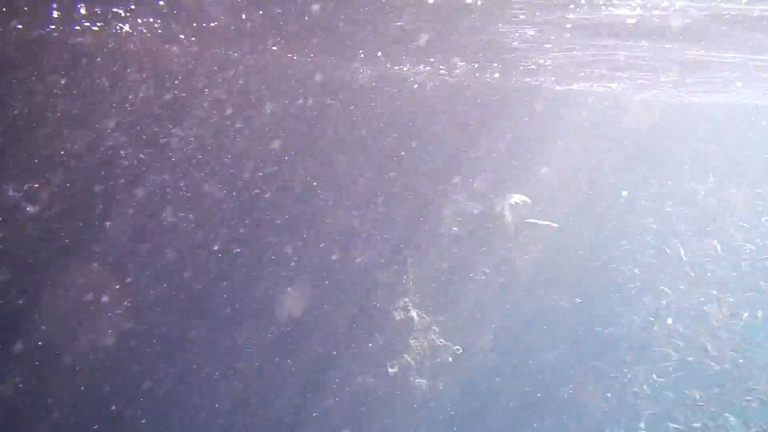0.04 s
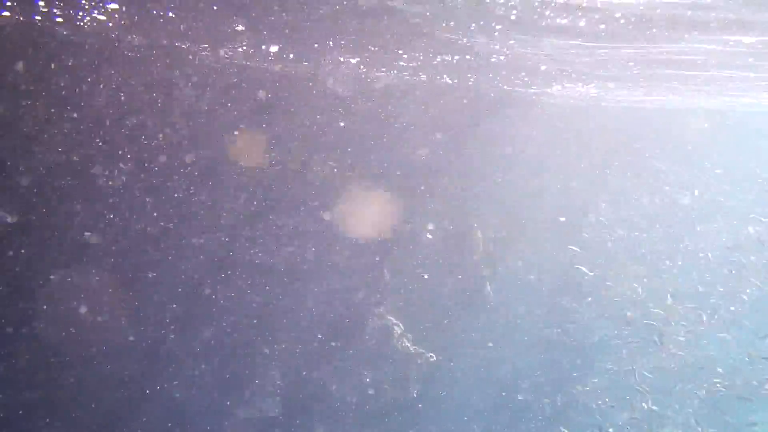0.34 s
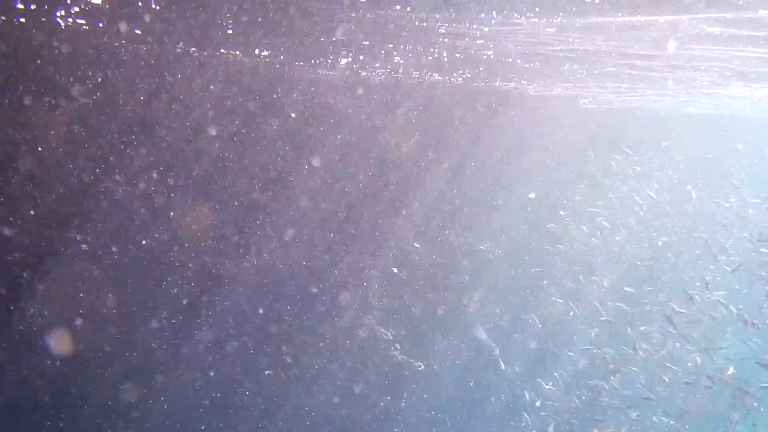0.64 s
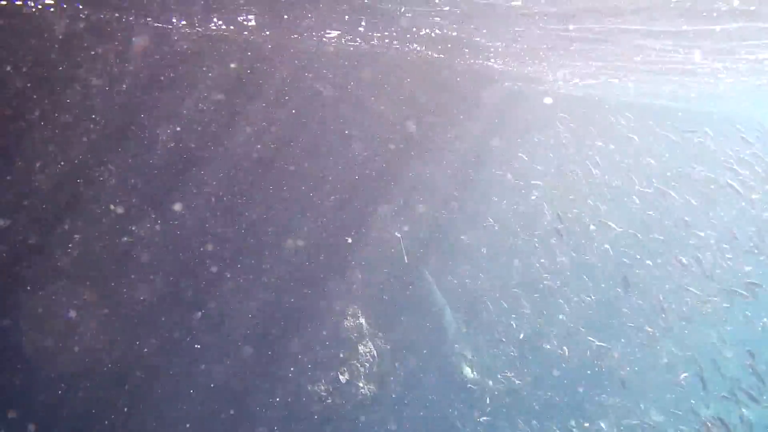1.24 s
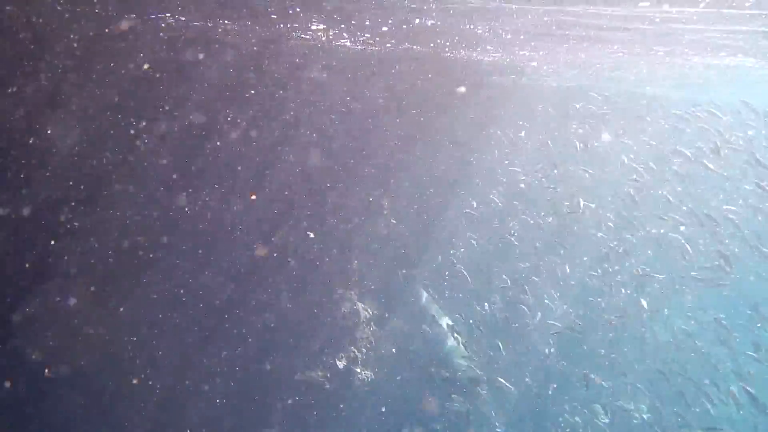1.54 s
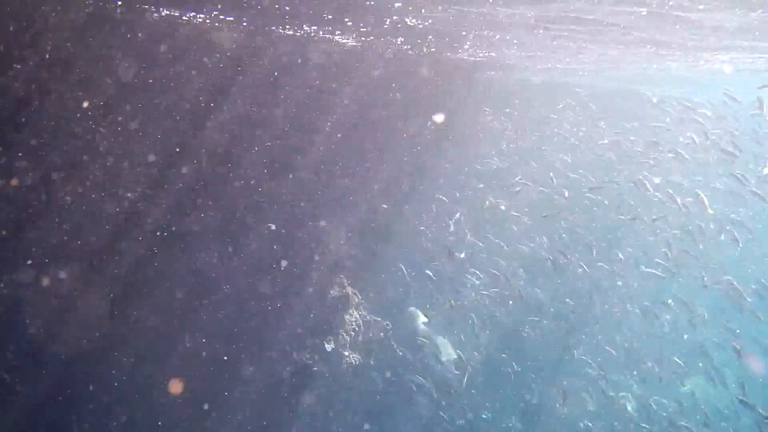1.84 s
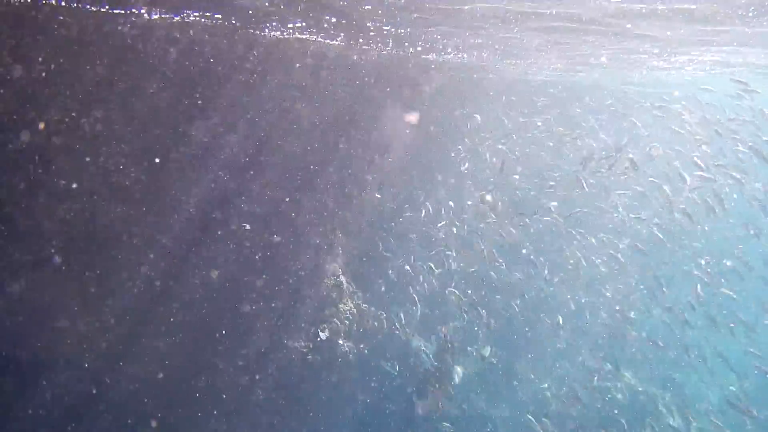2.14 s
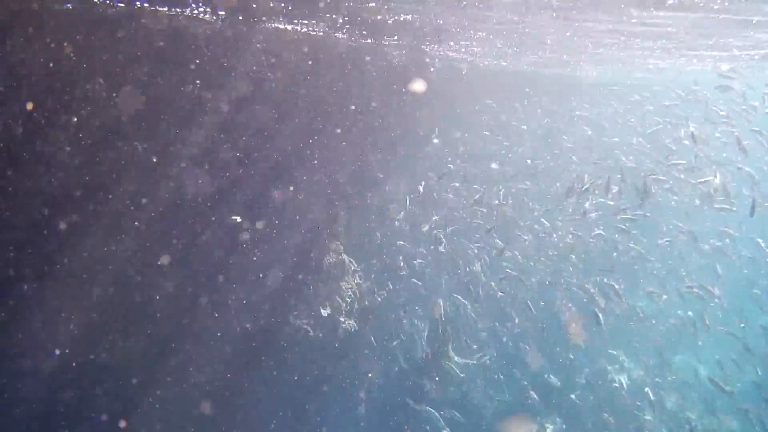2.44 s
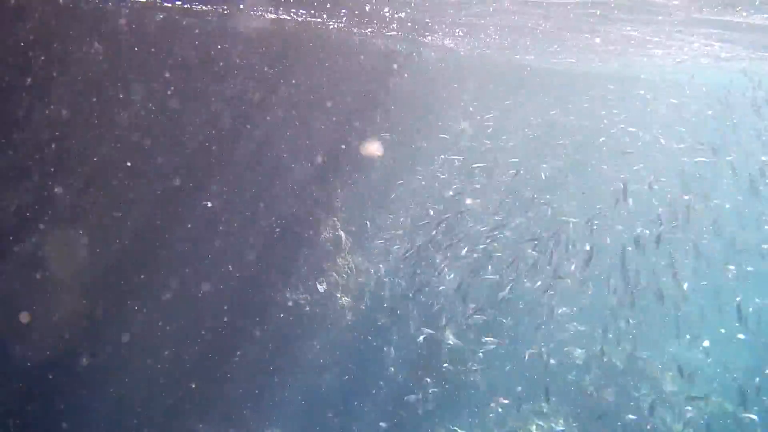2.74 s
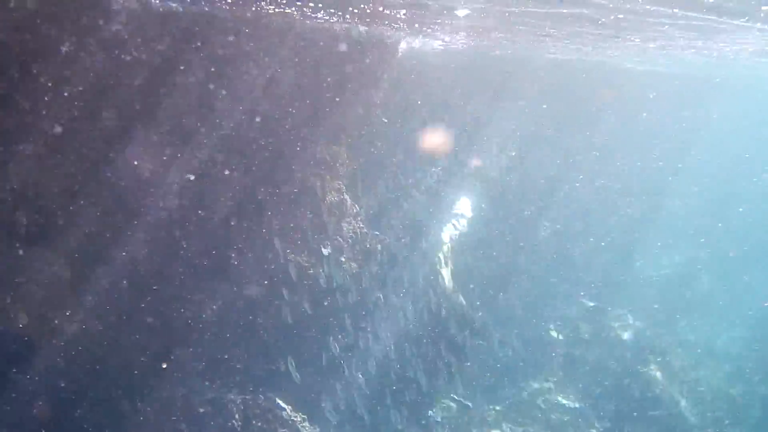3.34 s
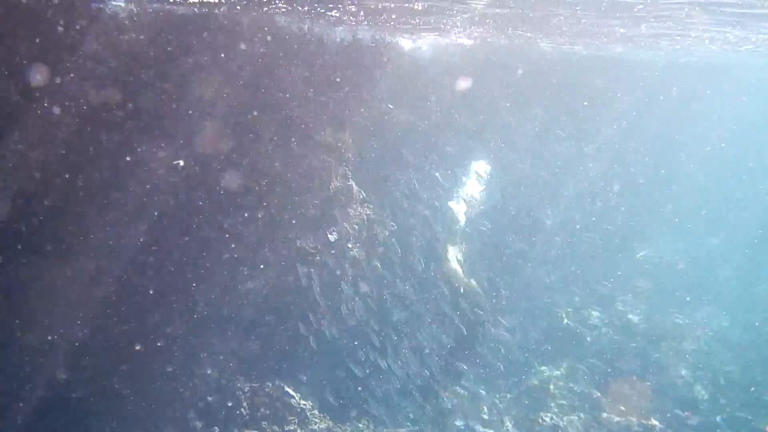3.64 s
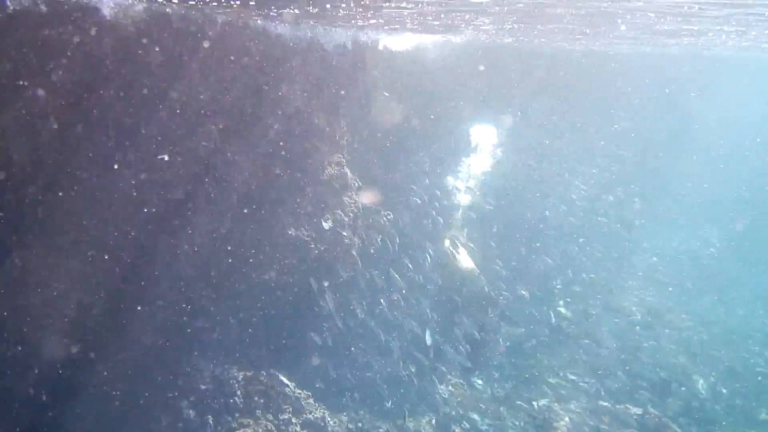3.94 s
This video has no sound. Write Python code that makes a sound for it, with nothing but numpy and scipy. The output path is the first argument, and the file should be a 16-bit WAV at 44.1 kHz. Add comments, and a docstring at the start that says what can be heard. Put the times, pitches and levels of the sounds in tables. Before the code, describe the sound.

Sharp underwater snaps and fine crackling over sloshing water and a few low glugs.

```python
"""Snapping reef, just under the surface

A camera in a waterproof housing drifts above a reef. Sharp snaps, most likely shrimp, ring the
case over a fine crackle of far snaps and tiny bursting bubbles. Water sloshes and slaps against
the case, falls calm for over a second, then returns with a few low glugs from large air pockets."""
import sys
import numpy as np
from scipy import signal
from scipy.fft import rfft, irfft
from scipy.io import wavfile
from scipy.ndimage import uniform_filter1d

SR = 44100
rng = np.random.default_rng(int(sys.argv[2]) if len(sys.argv) > 2 else 0)


def store_wav(level_fs):
    """Save 16-bit WAV to argv[1]."""
    pcm = np.round(np.clip(np.atleast_2d(level_fs), -1, 1) * 32767)
    wavfile.write(sys.argv[1], SR, pcm.T.astype(np.int16))


N = 176400
TIME = np.arange(N) / SR
TAPS = 4096  # length of the case's ring, in samples
FREQS = np.fft.rfftfreq(TAPS, 1 / SR)

# Levels in the tables are relative: each layer's function sets its place in the mix.
# What the case lets through: freq_hz, left_db, right_db
CASE_EQ = [(200, -6.5, -56), (750, -25.5, -8.5), (965, 3, -28.5), (1475, 3, -6), (2254, -2, -20),
           (3164, -8, -4), (4134, -23.5, -22), (5500, -26, -19), (6420, -27, -27), (7700, -18, -18.5),
           (8940, -31.5, -29), (10900, -43.5, -46.5), (15600, -59, -63.5)]
# Resonances of the case: freq_hz, width_hz, left_boost_db, right_boost_db
CASE_MODES = [(1018, 140, 3.5, 26.5), (1299, 160, 3, 7.5), (1815, 82, -2, 5.5), (1960, 240, 7.5, -0.5),
              (2202, 340, -15, 22), (2650, 560, 5, -10.5)]
# Tone of the case's steady hollow hum: freq_hz, level_db
CASE_HUM_EQ = [(200, -25), (340, -4.5), (430, 8.5), (500, 0), (620, 5.5), (1000, -37)]
# Swells of the wash of dense, distant snaps: time_s, level_db
WASH_FADER = [(0.0, -33), (0.31, -38), (0.69, -36), (0.76, -33.5), (0.89, -45.5), (1.07, -48.5),
              (1.51, -45), (2.22, -42.5), (2.58, -34.5), (3.12, -35), (3.51, -33), (4.0, -36)]
# Tone of the bubble hiss: freq_hz, level_db
HISS_EQ = [(1500, -2), (3200, -16), (4300, -6.5), (6000, -8.5), (7800, -3), (9300, -15.5), (11000, -17.5),
           (16000, -23.5)]
# Swells of tiny bubbles: time_s, level_db
FIZZ_FADER = [(0, -44), (.15, -48.5), (.19, -34.5), (.23, -46.5), (.29, -37.5), (.35, -43), (.42, -46),
              (.47, -32), (.55, -45.5), (.7, -45), (.88, -37), (.93, -68.5), (1.6, -60.5), (2.25, -48.5),
              (2.42, -43), (2.8, -43.5), (3.2, -44.5), (4, -44)]
# Swells of sloshing water: time_s, rumble_db, body_db
SLOSH_FADER = [(0.0, -40, -25), (0.44, -40.5, -28.5), (0.66, -32.5, -24), (0.76, -40.5, -26.5),
               (0.88, -44, -29.5), (0.95, -53, -43.5), (1.35, -48.5, -39), (1.47, -52, -46.5),
               (2.08, -49, -42), (2.45, -40, -27.5), (2.67, -39.5, -26), (2.85, -46.5, -25.5),
               (3.19, -34.5, -25.5), (3.39, -44, -27), (3.5, -42, -28.5), (3.73, -38.5, -26.5),
               (4.0, -36.5, -26.5)]
# Swells of the splash: time_s, level_db
SPLASH_FADER = [(0, -44), (.15, -31), (.25, -39), (.47, -34), (.5, -23), (.55, -26.5), (.6, -33.5),
                (.66, -29), (.72, -34.5), (.89, -42), (.94, -50.5), (1.55, -47.5), (2.26, -42),
                (2.29, -32.5), (2.38, -30.5), (2.42, -38), (3.2, -34.5), (4, -33.5)]
# Tone of the water's rumble, body and splash: freq_hz, level_db
RUMBLE_EQ = [(10, -49), (28, -0.5), (70, 2), (130, -5.5), (220, -11.5), (400, -71), (900, -43)]
BODY_EQ = [(60, -22.5), (150, -3.5), (280, -4), (370, -2), (480, -3.5), (620, -15), (900, -24), (2000, -64)]
SPLASH_EQ = [(250, -20), (480, -13), (640, -0.5), (720, -6.5), (830, -10), (1050, -8.5), (1600, -30.5),
             (3000, -81)]
# How alike slosh and hum are at the two microphones: freq_hz, coherence (0 to 1)
STEREO_COHERENCE = [(40, .85), (200, .94), (550, .92), (850, .6), (1300, .9)]
# Their phase between the microphones: freq_hz, left_lead_rad
STEREO_PHASE = [(40, 1.84), (200, 0.49), (350, 1.05), (500, -0.088), (750, 0.41), (1200, -0.73)]
# Their stereo balance: freq_hz, left_over_right_db
STEREO_PAN = [(35, -16), (90, -3.5), (200, -5), (400, 0.5), (520, 3.5), (650, -5.5), (900, 7.5)]
# Slaps of water on the case: peak_s, pitch_hz, level_db, decay_s, left_over_right_db
SLAP_CUES = [(.0355, 626, -5, 0.0035, 4.5), (.036, 332, -9, 0.0081, 1), (.129, 486, -10.5, 0.0014, -8),
             (.289, 149, -21.5, 0.0019, -29), (.567, 185, -18, 0.0026, -20), (.615, 148, -14.5, 0.0073, -7),
             (.647, 615, -15.5, 0.012, -2), (.746, 346, -7, 0.0036, -4), (.7993, 294, -11.5, 0.0013, -17),
             (.7995, 600, -8.5, 0.0047, 0), (.906, 212, -19, 0.0037, -29), (0.9106, 995, -16.5, 0.0042, 5),
             (.91, 613, 0.5, 0.0027, -3.5), (1.153, 223, -14, 0.0013, -5.5), (1.35, 620, -21, 0.0042, -2),
             (1.369, 330, -19.5, 0.0026, -8), (1.8492, 176, -15, 0.003, -6.5), (1.955, 136, -35, .006, -4),
             (2.281, 355, -11, 0.0037, -5.5), (3.114, 268, -5, 0.0049, -5), (2.368, 637, -14.5, 0.007, 1.5),
             (2.579, 93, -21, 0.019, -7.5), (3.759, 126, -8, 0.0017, -6), (3.872, 94, -14, .008, -2)]
# Glugs of large air pockets: peak_s, half_length_s, pitch_hz, glide_hz_per_s, level_db
GLUG_CUES = [(2.688, .025, 195, 2.5, -15), (2.739, 0.021, 200, -100, -8.5),
             (2.784, 0.0237, 190, -100, -4.5), (2.859, 0.02547, 202, 408, -12.5),
             (2.922, 0.024, 165, 8.5, -21), (3.036, 0.0379, 146, -200, -16),
             (3.174, 0.0259, 205, -200, -19), (3.316, .03, 265, 901, -20),
             (3.519, 0.0342, 270, -200, -20.5)]
# Snaps close to the camera: start_s, level_db, treble_lift_db, ring_hz, ring_boost_db
SNAP_CUES = [(0.0666, -19, 15, 5630, 5), (0.0883, -2.5, -6.5, 3100, 2.5), (0.1824, -20, 15, 4930, 9),
             (.269, -12.5, 13.5, 5500, 9.5), (0.2862, -14, 5, 7700, 15), (0.2963, -8.5, 4.5, 7760, 3),
             (0.4636, -22, 17, 1620, 14.5), (0.477, -13.5, -1, 4300, 14), (.6261, -21.5, 14.5, 3180, 13.5),
             (0.759, 0.5, -18, 7100, 15), (0.7997, -14, -6, 3330, 13), (0.9079, -12.5, -0.5, 6400, 8.5),
             (1.048, -16, 5.5, 2720, 4.5), (1.1878, -25.5, -6, 3400, 7), (1.2226, -2.5, 4, 1680, 1),
             (1.2897, -28.5, 14, 5000, 6), (1.3112, -31, 17, 5500, -3), (1.3455, -31.5, 14, 4300, 6),
             (1.411, -0.5, -15.5, 3900, 7.5), (1.6465, -21.5, 9.5, 3430, 10.5), (1.714, -19, -2, 4800, 4),
             (1.752, -6, -23.5, 8540, 21.5), (1.8044, -1, -9, 5860, 6.5), (1.8771, -19.5, -4, 5500, 9),
             (1.9084, -6.5, 5, 4100, 1.5), (1.9851, -28, 14, 3460, 13), (2.0484, -10.5, 12.5, 4220, 1.5),
             (2.3386, -21.5, 16.5, 5550, 19), (2.3998, -24.5, 23.5, 3670, 14.5),
             (2.5151, -14, 17.5, 3550, 9.5), (2.6873, -5.5, 1.5, 5550, 3.5), (2.7253, -10, -16, 1360, 6.5),
             (2.8437, -24, 2, 7240, 22), (2.8539, -9, 12, 2780, 10), (2.96, -24, 3, 9100, 21),
             (2.9802, -30, 18, 7800, 18), (3.028, -24.5, 21, 9000, 2.5), (3.1318, -2.5, 7, 6540, -2.5),
             (3.288, -18, 9, 3740, 12), (3.3123, -23, 11.5, 6500, 23.5), (3.3739, -4.5, -15, 6000, 3),
             (3.402, -19, 28.5, 3350, 11), (3.5309, -10.5, 7.5, 2070, 8.5), (3.6095, -15, 8, 5800, 2),
             (3.6383, -5, 4, 4270, 7), (3.7342, -24.5, 10, 2740, 15), (3.8138, -3, -3, 8000, 0),
             (3.882, -17, 2.5, 4700, 19.5), (3.9582, -12.5, 9, 3520, 14.5)]
# The camera's narrow treble notches: freq_hz
NARROW_NOTCHES = (5000, 6000, 7000, 8000, 9000, 10000)


def amp(db):
    return 10 ** (np.asarray(db) / 20)


def unit_rms(x):
    return x / np.sqrt(np.mean(x ** 2) + 1e-20)


def curve_at(points, hz, column=1):
    """One column of a frequency table, joined up on a log-frequency axis."""
    table = np.array(points)
    return np.interp(np.log(hz + 1), np.log(table[:, 0] + 1), table[:, column])


def fader(points, column=1):
    """Gain over time from one dB column of a fader table."""
    table = np.array(points)
    return amp(np.interp(TIME, table[:, 0], table[:, column]))


def pan(left_over_right_db):
    return amp([[left_over_right_db / 2], [-left_over_right_db / 2]])


def place(mix, start_s, sound):
    """Mix in a stereo sound, trimming whatever overhangs either end."""
    start = round(start_s * SR)
    part = mix[:, max(start, 0):max(start + sound.shape[1], 0)]
    part += sound[:, max(-start, 0):][:, :part.shape[1]]


def sprinkle(grains, per_s, spread_db):
    """Stereo grains at random moments, many small and a few large."""
    out = np.zeros((2, N))
    draws = rng.random((3, 12000)).T
    for position, pick, size in draws[:int(per_s * N / SR)]:
        boost_db = spread_db * min(-np.log(1 - size), 4)
        place(out, position * N / SR, amp(boost_db) * grains[int(pick * len(grains))])
    return unit_rms(out)


def patchy_noise(eq):
    """Patchy noise, reaching the two microphones with different strength and phase."""
    spectrogram = signal.stft(rng.standard_normal((2, N)), nperseg=1024)[2]
    patches = uniform_filter1d(rng.standard_normal(spectrogram.shape[1:]), size=6, axis=0)
    patches_db = 2.5 * unit_rms(uniform_filter1d(patches, size=2, axis=1))
    shared, separate = rfft(signal.istft(spectrogram * amp(patches_db), nperseg=1024)[1][:, :N])
    hz = np.fft.rfftfreq(N, 1 / SR)
    coherence = curve_at(STEREO_COHERENCE, hz)
    lean_left = amp(curve_at(STEREO_PAN, hz) / 2)
    left = shared * lean_left * np.exp(1j * curve_at(STEREO_PHASE, hz))
    right = (coherence * shared + np.sqrt(1 - coherence ** 2) * separate) / lean_left
    top_hz = eq[-1][0]
    tone = amp(curve_at(eq, hz)) / (1 + (hz / top_hz) ** 4)
    return unit_rms(irfft(np.array([left, right]) * tone, N))


def case_ring(lift_db, ring_hz=1000, ring_db=0):
    """The case's ring at each microphone, coloured by a click's brightness and its own ring."""
    lift_hz, ring_width = 3700, 0.52  # width as a share of the ring's pitch
    treble_db = lift_db * FREQS ** 2 / (FREQS ** 2 + lift_hz ** 2)
    peak_db = ring_db / (1 + (2 * (FREQS / ring_hz - 1) / ring_width) ** 2)
    sides = []
    for side in range(2):
        db = curve_at(CASE_EQ, FREQS, column=side + 1) + treble_db + peak_db
        for hz, width_hz, *boost_db in CASE_MODES:
            db = db + boost_db[side] / (1 + (2 * (FREQS - hz) / width_hz) ** 2)
        # Minimum phase: a hard attack with all the ringing after it.
        cepstrum = irfft(np.log(amp(db)))
        cepstrum[1:TAPS // 2] *= 2
        cepstrum[TAPS // 2 + 1:] = 0
        sides.append(irfft(np.exp(rfft(cepstrum))))
    return np.array(sides)


def snap(lift_db, ring_hz, ring_db):
    """A click from some direction and its short scatter off rock and surface, through the case."""
    t60_s, rise_s, lowpass_hz = 0.028, 0.00046, 8500
    t = TIME[:TAPS // 2]
    scatter = rng.standard_normal((2, len(t))) * amp(-60 * t / t60_s) * (1 - np.exp(-t / rise_s))
    scatter = signal.lfilter(*signal.butter(1, lowpass_hz, fs=SR), scatter)
    scatter = amp(-6) * scatter / np.linalg.norm(scatter[0])
    left_lag_s = 30e-6 + 25e-6 * rng.standard_normal()
    samples_from_peak = (t - np.array([[left_lag_s / 2], [-left_lag_s / 2]])) * SR - 8
    click = np.sinc(samples_from_peak) * np.exp(-(samples_from_peak / 4) ** 2)
    return signal.fftconvolve(click + scatter, case_ring(lift_db, ring_hz, ring_db), axes=1)[:, :TAPS]


def crackle(per_s, spread_db, lift_db):
    """A spray of small clicks from a palette of 24, each with its own pitch and direction."""
    clicks = [snap(lift_db, ring_hz, ring_db=21) for ring_hz in np.geomspace(2920, 10040, 24)]
    evened = [click / np.linalg.norm(click) ** 0.92 for click in clicks]
    return sprinkle([click * pan(2 * rng.standard_normal()) for click in evened], per_s, spread_db)


def case_hum():
    """The case's steady hollow hum, strongest near 430 Hz."""
    return amp(-37.5) * patchy_noise(CASE_HUM_EQ)


def wash():
    """A wash of dense, distant snaps keeps the case softly ringing."""
    ringing = signal.oaconvolve(rng.standard_normal((1, N)), case_ring(lift_db=-32), axes=1)[:, :N]
    return amp(-2) * fader(WASH_FADER) * unit_rms(ringing)


def far_snaps():
    """Distant snaps blend into a faint, steady crackle."""
    return amp(-49) * crackle(per_s=83, spread_db=1, lift_db=5.5)


def hiss():
    """Countless tiny bubbles merge into a wide hiss that swells with the fizz and never quite stops."""
    tone = amp(curve_at(HISS_EQ, np.fft.rfftfreq(N, 1 / SR)))
    noise = irfft(rfft(rng.standard_normal((2, N))) * tone, N)
    swell, calm_floor = amp(-11) * fader(FIZZ_FADER), amp(-62.5)
    return np.hypot(swell, calm_floor) * unit_rms(noise)


def fizz():
    """Tiny bubbles burst in clumps while the water moves."""
    knots_s = np.arange(0, N / SR + 1, 1 / 50)
    clumps_db = 3.5 * np.interp(TIME, knots_s, rng.standard_normal(len(knots_s)))
    return amp(5 + clumps_db) * fader(FIZZ_FADER) * crackle(per_s=1000, spread_db=7, lift_db=-2.5)


def slosh():
    """Rumble, body and splash of moving water."""
    rumble = amp(8.5) * fader(SLOSH_FADER, column=1) * patchy_noise(RUMBLE_EQ)
    body = amp(1.5) * fader(SLOSH_FADER, column=2) * patchy_noise(BODY_EQ)
    splash = amp(1.5) * fader(SPLASH_FADER) * patchy_noise(SPLASH_EQ)
    return rumble + body + splash


def bubbles():
    """Small bubbles in the splash ring as short, rising blips."""
    decay_cycles, rise_per_cycle = 3.5, 0.022
    blips = []
    for pitch_hz in np.geomspace(304, 721, 24):
        cycles = pitch_hz * TIME[:TAPS // 2]
        envelope = (1 - np.exp(-2 * cycles)) * np.exp(-cycles / decay_cycles)
        chirp = np.sin(2 * np.pi * cycles * (1 + rise_per_cycle * cycles / 2))
        blips.append(pan(2 * rng.standard_normal() - 2) * envelope * chirp)
    return amp(-1) * fader(SPLASH_FADER) * sprinkle(blips, per_s=110, spread_db=3.5)


def slaps():
    """Water knocks on the case: each slap swells within a cycle and dies quickly."""
    preroll_s, rise_cycles = 0.03, 0.52
    out = np.zeros((2, N))
    t = TIME[:2 * TAPS] - preroll_s
    for peak_s, pitch_hz, level_db, decay_s, pan_db in SLAP_CUES:
        attack = np.exp(-(np.minimum(t, 0) * pitch_hz / rise_cycles) ** 2)
        tail = np.exp(-np.maximum(t, 0) / decay_s)
        knock = attack * tail * np.cos(2 * np.pi * pitch_hz * t)
        place(out, peak_s - preroll_s, amp(level_db) * pan(pan_db) * knock)
    return out


def glugs():
    """Large air pockets ring low and rough, swelling and fading as their pitch slides."""
    roughness_per_s, left_lead_rad = 70, 0.55
    swells, pitches = [], []
    for peak_s, half_s, pitch_hz, glide_hz_per_s, level_db in GLUG_CUES:
        swells.append(amp(level_db) * np.exp(-((TIME - peak_s) / half_s) ** 2) + 1e-12)
        pitches.append(pitch_hz + glide_hz_per_s * np.clip(TIME - peak_s, -2 * half_s, 2 * half_s))
    # One voice plays them all, its pitch leaning toward the loudest glug.
    voice_hz = np.average(pitches, axis=0, weights=swells)
    knots_s = np.arange(0, N / SR + 1, 1 / roughness_per_s)
    flutter, wobble = [np.interp(TIME, knots_s, row) for row in rng.standard_normal((2, len(knots_s)))]
    phase = 2 * np.pi * np.cumsum(voice_hz) / SR + 0.5 * wobble
    envelope = (1 + 0.125 * flutter) * np.sum(swells, axis=0)
    return pan(-4) * envelope * np.array([np.sin(phase + left_lead_rad), np.sin(phase)])


def near_snaps():
    """Single sharp snaps close to the camera set the case ringing."""
    out = np.zeros((2, N))
    for start_s, level_db, lift_db, ring_hz, ring_db in SNAP_CUES:
        place(out, start_s, amp(level_db + 20.5) * snap(lift_db, ring_hz, ring_db))
    return out


def scene():
    """Snaps far and near, bubbles, moving water and the case's hum, in stereo."""
    return (far_snaps() + near_snaps() + fizz() + hiss() + wash()
            + slosh() + case_hum() + bubbles() + slaps() + glugs())


def record(dry):
    """The camera has one wide and several narrow treble notches, a soft ceiling and a steep top cut."""
    wide_notch_hz, ceiling, cutoff_hz = 2525, 0.97, 16000
    notched = signal.lfilter(*signal.iirnotch(wide_notch_hz, Q=4.2, fs=SR), dry)
    for hz in NARROW_NOTCHES:
        notched = signal.lfilter(*signal.iirnotch(hz, Q=hz / 40, fs=SR), notched)  # 40 Hz wide
    limited = notched / (1 + (notched / ceiling) ** 8) ** (1 / 8)
    lowpass = signal.firwin(511, cutoff_hz, window=("kaiser", 9), fs=SR)
    return signal.oaconvolve(limited, lowpass[None], "same")


dry = scene()
out = record(dry)
store_wav(out)
```